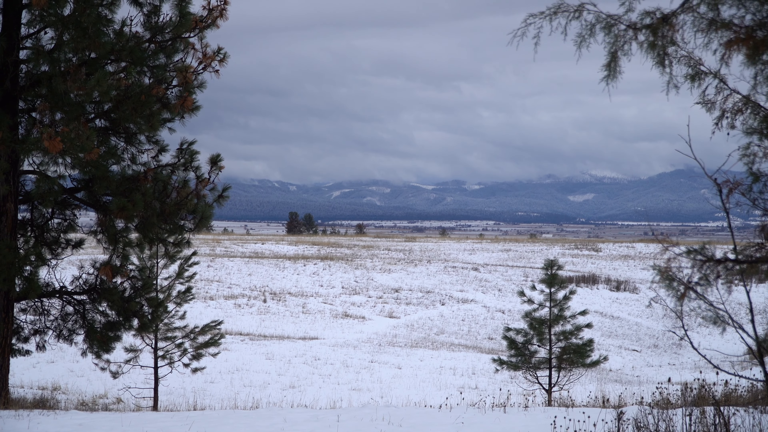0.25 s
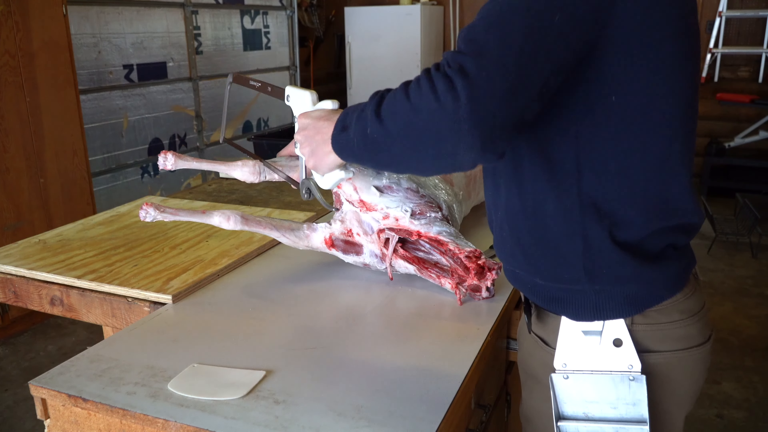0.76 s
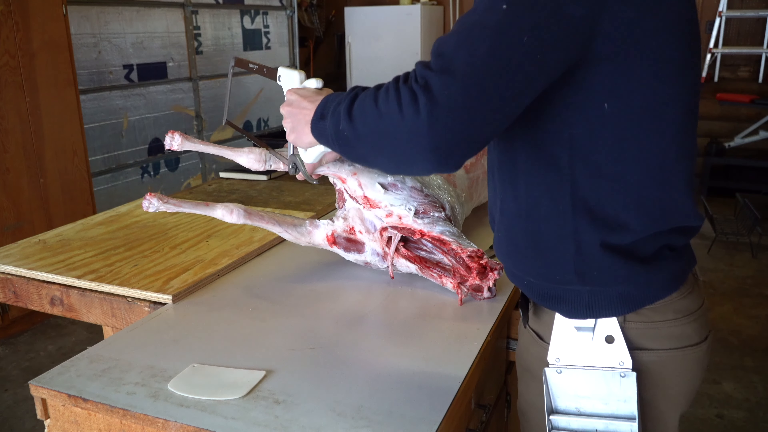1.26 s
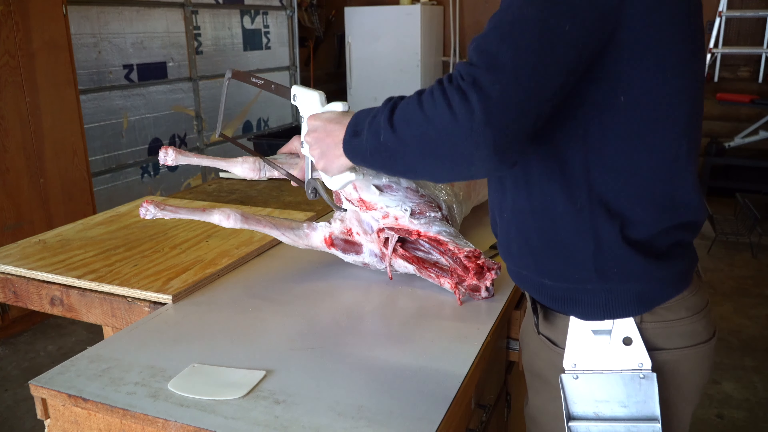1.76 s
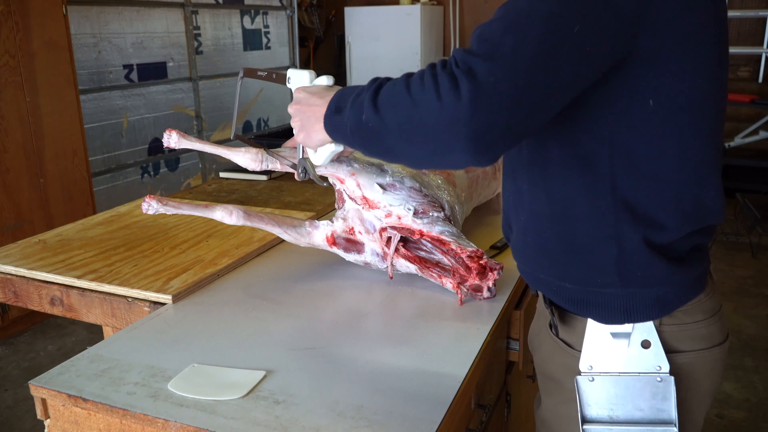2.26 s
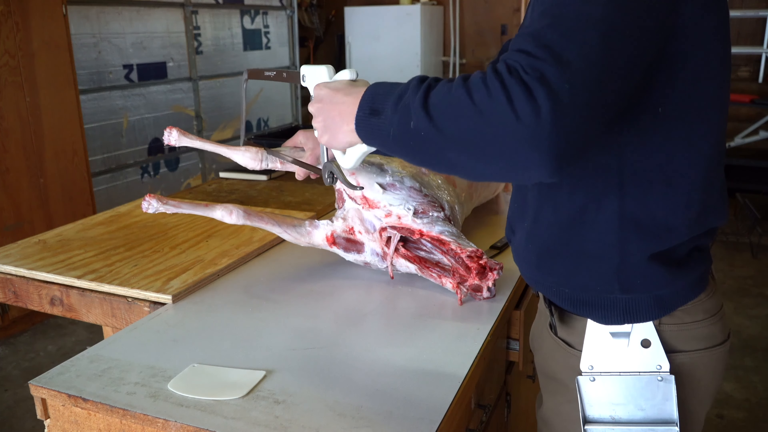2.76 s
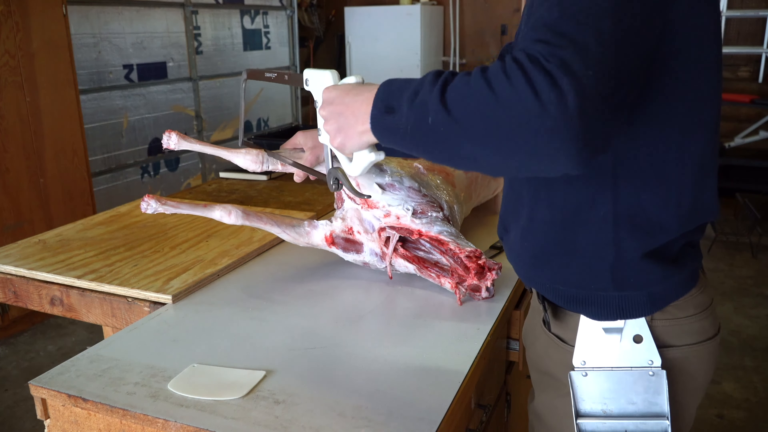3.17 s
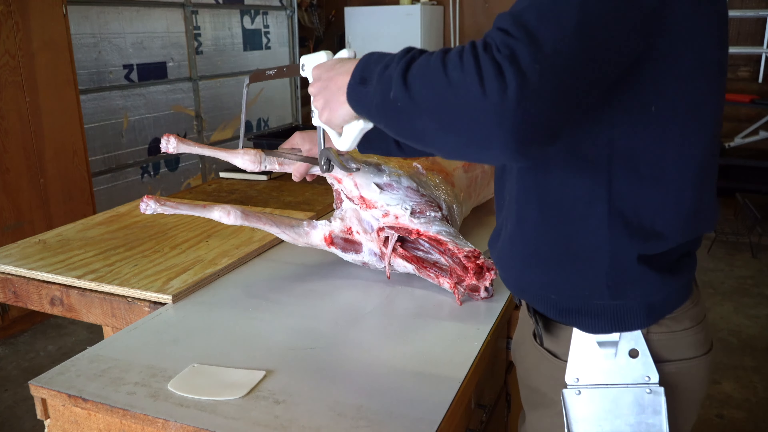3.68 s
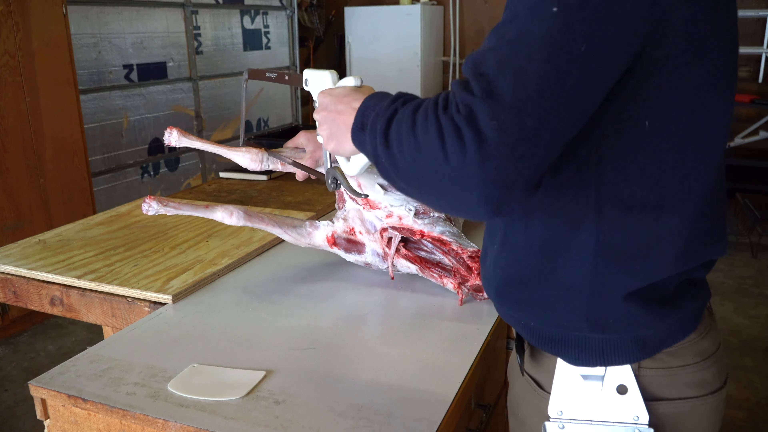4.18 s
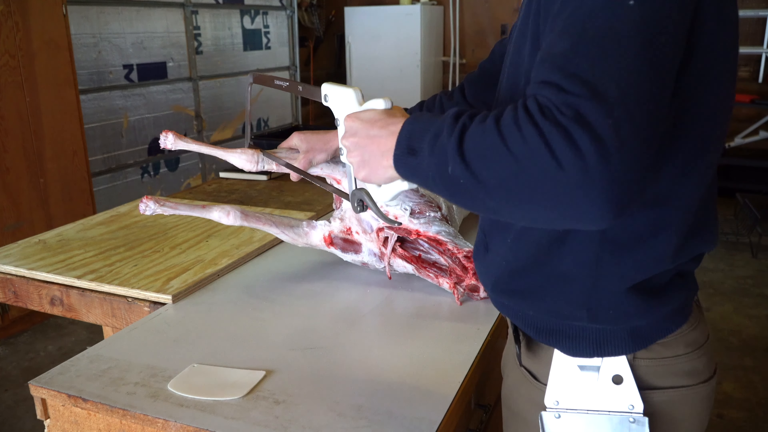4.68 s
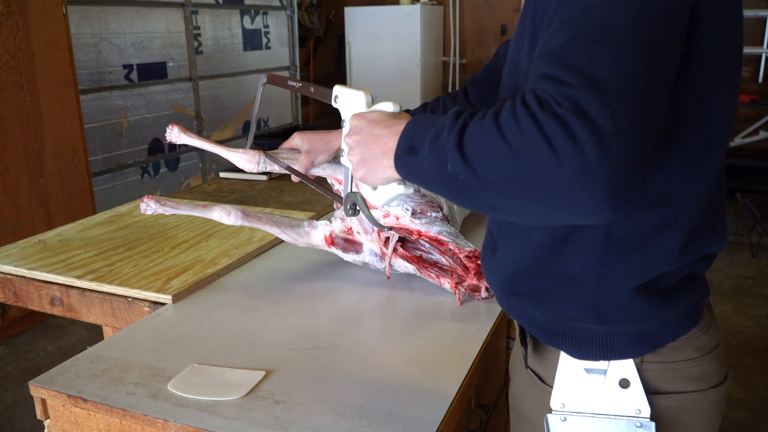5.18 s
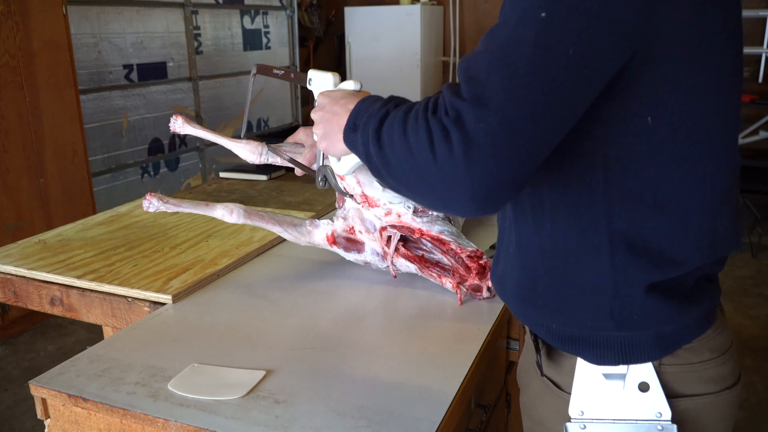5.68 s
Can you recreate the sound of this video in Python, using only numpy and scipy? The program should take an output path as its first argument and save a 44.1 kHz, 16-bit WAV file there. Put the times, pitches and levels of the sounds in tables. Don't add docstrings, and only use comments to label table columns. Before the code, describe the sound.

From 0 to 0.55 s it is quiet outdoors: deep wind buffets the microphone over faint hiss, a distant clang fades, and tiny ticks come near 0.25 s. A hard cut leads into a bare garage with faint airy hum. At 0.7-0.9 s a hand saw bites bone with a strong, gritty, quickly pulsing rasp and a brief squealing chatter. Small knocks precede another bright stroke at 1.75-1.9 s. Weaker scratches follow at 2.13 and 2.28 s, then a duller stroke around 2.55-2.65 s. From 2.7 to 3.8 s there are mostly knocks and light scrapes. A soft bass shudder of the table at 3.7-3.95 s underlies a faint cut. Short rasps return at 4.2, 4.6, 4.8 and 5.15 s, with a sharp knock at 4.28 s. The loudest, crunchiest stroke lands at 5.6-5.7 s, then a lighter one at 5.93 s. The blade rings metallically; walls give a half-second tail.

```python
import sys
import numpy as np
from scipy import signal
from scipy.fft import rfft, irfft, next_fast_len
from scipy.io import wavfile
from scipy.ndimage import uniform_filter1d

SR = 44100
rng = np.random.default_rng(int(sys.argv[2]) if len(sys.argv) > 2 else 0)


def digitize_waveform(pressure):
    field = np.atleast_2d(pressure).T
    bounded = np.clip(field, -1, 1)
    quanta = np.round(bounded * 32767).astype(np.int16)
    wavfile.write(sys.argv[1], SR, quanta)


def decibels_to_gain(level_db):
    exponent = np.asarray(level_db, float) / 20
    return 10 ** exponent


N = 261954
T = np.arange(N) / SR
HOP = 32
CUT_S = 0.561

# pitch_hz, width_hz, level_db
HIGH_MODES = [(4680, 58, 0.5), (5030, 64, -1), (5190, 48, -3), (5430, 80, 2.5), (5550, 71, 1.5)]


def saw():
    # peak_s, peak_db, rise_s (over 20 dB), fall_s (over 20 dB), brightness_db
    bites = [(.700, -40, 0.02, 0.0347, -7), (.728, -32, 0.0377, .04, -6.5), (.762, -30.5, 0.0429, .04, -2),
             (.788, -27, 0.0272, .03, -4.5), (.809, -21, 0.0265, .014, -5.5), (.855, -25, 0.0619, .03, -4),
             (.885, -33, 0.0334, .03, -7), (1.757, -38, 0.02, 0.02, -4.5), (1.778, -29, 0.0246, .04, -5),
             (1.815, -26.5, .04, 0.0336, -0.5), (1.858, -29, .05, .055, -5.5),
             (2.13, -34, 0.0063, .03, 0.5), (2.148, -37.5, 0.016, .035, 3), (2.262, -45, 0, 0.0143, 2),
             (2.277, -41.5, 0.01, 0.0146, 2.5), (2.541, -30.5, 0.028, 0.0362, -7),
             (2.578, -27.5, .05, 0.0473, -11), (2.62, -31.5, .04, 0.0329, -9.5),
             (3.822, -39, 0.0257, .08, -9.5), (3.88, -35, 0.064, 0.0451, -12),
             (3.925, -40, 0.0443, .04, -10.5), (4.169, -27, 0.01, 0.007, -6),
             (4.194, -27, 0.0271, 0.0135, -1), (4.222, -32.5, 0.027, 0.0134, -0.5),
             (4.531, -45.5, .004, 0.1, 0), (4.576, -28, .045, .04, -13.5), (4.607, -28, .035, 0.0373, -11),
             (4.645, -31, .08, .035, -14), (4.773, -24.5, 0.0017, .045, -12.5),
             (4.8, -26.5, .03, 0.05, -7.5), (4.829, -25, 0.02, .055, 0), (4.856, -25.5, 0.04, .05, -3),
             (5.07, -44, 0.03, 0.07, -1.5), (5.096, -31.5, .012, 0.1062, -6.5),
             (5.162, -25.5, 0.0324, .044, -14), (5.62, -21, .006, 0.0272, -11),
             (5.634, -20, .015, 0.0267, -8.5), (5.673, -18.5, 0.0388, 0.02, -3),
             (5.918, -35.5, 0.02, .02, -9), (5.934, -34, 0.02, .1, -6)]
    rasp_db, bright_db = surges(bites)
    force = decibels_to_gain(rasp_db)
    teeth, crush, dust_db = strokes()
    push = smear(0.66 * teeth + crush, length_s=0.0038)
    cutting = decibels_to_gain(-2) * rasp(push, bright_db)
    cutting = cutting + blade_sheen(push) * decibels_to_gain(bright_db - 1.5)
    cutting = cutting + dust() * decibels_to_gain(dust_db + 0.19 * bright_db - 4.0)
    return force * cutting + thuds(teeth, crush) + decibels_to_gain(-13) * blade_ring(push, force)


def strokes():
    # fastest_s, tooth_rate_hz, slowing_hz_per_s (away from fastest),
    # crushing_share (0-1), dust_db
    hand_strokes = [(.826, 519.9, 2199, 0.16, -23.5), (1.86, 395, 900, 0.36, -23.5),
                    (2.13, 322.5, 299.5, .66, -27), (2.28, 309.3, 399.7, 0.96, -28),
                    (2.58, 350.9, 499.8, 0.14, -33), (3.83, 311.9, 800, 0.53, -23),
                    (4.18, 317.8, 300, 0.91, -19), (4.53, 346.4, 599.5, 0.39, -28.5),
                    (4.84, 382, 299.9, 0.65, -21), (5.15, 360.6, 901.5, 0.44, -27),
                    (5.675, 399.5, 1303, 0.62, -19), (5.93, 273, 50.4, .8, -25)]
    stroke_ends = [1.3, 2.1, 2.23, 2.4, 3.3, 4.05, 4.4, 4.74, 5.0, 5.4, 5.8]
    now = np.searchsorted(stroke_ends, T)
    fastest_s, top_hz, slowing, rough, dust_db = np.transpose(hand_strokes)[:, now]
    away_s = np.maximum(fastest_s - T, 1.7 * (T - fastest_s))
    tooth_hz = np.maximum(top_hz - slowing * away_s, 210.)
    teeth, phase = impacts(tooth_hz, jitter=.035, scatter_db=2.0)
    crush = level(grit(spread_db=1.5) * (0.83 + np.exp(-phase / 0.65)), 0)
    rough = np.clip(rough, .02, .98)
    return teeth * np.sqrt(1 - rough), crush * np.sqrt(rough), dust_db


def rasp(push, bright_db):
    # freq_hz, density_db (per Hz)
    rasp_curve = [(290, -40), (500, -4.5), (1070, -6.5), (1730, -1), (2290, -8.5), (2730, -3.5),
                  (3700, -9.5), (4300, -16), (5000, -15.5), (6500, -21), (11000, -120)]
    centre_hz = 2240 * 2 ** (-0.02 * bright_db)
    bands = blotched(push, centre_hz, spread=0.63, flicker_db=7.5, rate=40, skirt=0.38)
    return evened(level(colour(bands, rasp_curve), 0))


def blade_sheen(push):
    # freq_hz, density_db (per Hz)
    sheen_curve = [(2530, -12.5), (4300, -11), (4720, -3.5), (5050, 4.5), (5360, 2), (5650, 0),
                   (5980, -12.5), (7000, -57), (9100, -67.5), (15400, -120)]
    band = level(colour(push, sheen_curve), 0) * decibels_to_gain(4.5 * walk(90))
    modes = sum(flicker(5.5, 25, decibels_to_gain(db)) * ring(push, 1. * hz, 1. * width) for hz, width, db in HIGH_MODES)
    return evened(level(band + level(modes, -4.5), 0))


def blade_ring(push, force):
    # pitch_hz, width_hz, level_db
    blade_modes = [(740, 7.9, -8), (895, 28, 2.5), (1253, 44, 7), (1680, 45, 3), (2740, 23, -9),
                   (3150, 82, 0), (3630, 71, -1.5), (4160, 48, -10)]

    def blade(x):
        return sum(flicker(2.5, 14, decibels_to_gain(db)) * ring(x, 1. * hz, 1. * width) for hz, width, db in blade_modes)

    return blade(force * push) / np.sqrt(np.mean(blade(push) ** 2))


def dust():
    # freq_hz, density_db (per Hz)
    dust_curve = [(4120, -25.5), (7000, -23), (7980, -5.5), (9840, 5), (10900, -7), (13200, -5),
                  (14700, -19), (15700, -18)]
    return level(colour(grit(spread_db=3.0) * decibels_to_gain(1.3 * walk(80)), dust_curve), 0)


def thuds(teeth, crush):
    # peak_s, peak_db, rise_s, fall_s
    shakes = [(0.717, -43, 0.031, 0.03), (0.79, -42.5, 0.061, 0.051), (0.852, -32, 0.073, 0.065),
              (1.793, -30.5, 0.025, 0.028), (1.843, -37, 0.13, 0.1), (2.129, -38, 0.011, 0.044),
              (2.279, -45, 0.066, 0.031), (2.525, -45.5, 0.01, 0.034), (2.599, -32, 0.076, 0.061),
              (3.839, -44, 0.097, 0.017), (3.895, -37.5, 0.068, 0.038), (4.171, -29.5, 0.016, 0.014),
              (4.195, -36, 0.058, 0.088), (4.594, -36.5, 0.068, 0.096), (4.643, -43, 0.007, 0.027),
              (4.778, -29, 0.014, 0.02), (4.845, -32, 0.043, 0.069), (5.125, -40, 0.067, 0.075),
              (5.187, -39, 0.015, 0.046), (5.618, -29, 0.0052, 0.048), (5.673, -25.5, 0.011, 0.028),
              (5.937, -37, 0.023, 0.01)]
    thud_db = surges([tuple(row) + (0,) for row in shakes])[0]
    body = [(90, -13.5), (170, 4), (240, 2.5), (450, 6.5), (700, -12.0)]
    return level(colour(teeth + 0.6 * crush, body), -0.33) * decibels_to_gain(thud_db)


def chatter():
    # centre_s, length_s, rate_hz, glide_hz_per_s, peak_db
    slip_trains = [(0.735, .02, 652, 801, -38), (.786, 0.013, 1172, 3000.5, -26),
                   (.808, 0.0078, 924, 1497, -16.5), (0.861, .01, 1745, -4000, -27.5),
                   (1.82, 0.015, 784, 500, -29), (1.868, 0.016, 569, -6000, -29.5),
                   (2.153, 0.019, 1680, 2, -40.5), (2.543, 0.0095, 577, 2998, -29.5),
                   (2.58, 0.022, 1195, -500, -29.5), (2.615, 0.012, 626.5, -500, -32.5),
                   (3.872, 0.0087, 896, 500, -35), (4.174, 0.0098, 1680, 0, -27.5),
                   (4.23, 0.022, 1252, 0, -39.5), (4.655, 0.042, 1253, -1, -30.5),
                   (4.86, 0.027, 1257, 0, -31), (5.152, .014, 722, -2000, -34), (5.163, 0.02, 1680, 1, -27),
                   (5.516, 0.017, 2680, 500, -50.5), (5.631, .007, 602, 3000, -25),
                   (5.674, 0.0089, 415, 0, -25), (1.773, 0.014, 5400, 2000, -30.5),
                   (1.806, 0.007, 5180, -4000, -23), (1.826, 0.011, 5010, -9000, -26),
                   (5.631, 0.0089, 1690, 0, -19), (0.728, 0.015, 1260, 500, -35),
                   (.727, 0.0098, 1620, 0, -37), (0.801, 0.015, 897, 0, -27), (.861, .013, 1254, 0, -31),
                   (.89, .014, 895, 0, -38.5), (1.84, .02, 1250, 0, -33), (1.864, .025, 1728, -1500, -35),
                   (1.94, 0.018, 770, 0, -52), (4.585, .025, 1722, 0, -32.5), (4.79, .014, 1688, 0, -27.5),
                   (4.835, .018, 1750, 0, -25.5), (4.86, .015, 3150, 0, -31.5), (5.656, .015, 1683, 0, -28),
                   (5.921, .009, 1593, 0, -38), (4.607, 0.016, 848, -1000, -35.5),
                   (3.83, .015, 903, 0, -42)]
    out = np.zeros(N)
    wobble = 0.4 * walk(150)
    flutter = decibels_to_gain(1.5 * walk(200))
    for s, length, hz, glide, db in slip_trains:
        if hz > 1050:
            share = .08
        elif glide > 1200:
            share = 0.83
        else:
            share = .4
        near = slice(int((s - 3 * length) * SR), int((s + 3 * length) * SR))
        t = T[near] - s
        turns = hz * t + glide * t ** 2 / 2
        turns = turns + wobble[near] * hz / (2 * np.pi * 2000)
        overtones = [k for k in range(4) if (k + 1) * hz < 8000]
        stack = sum(share ** k * np.cos(2 * np.pi * (k + 1) * turns) for k in overtones)
        out[near] += decibels_to_gain(db) * np.exp(-(t / length) ** 2) * stack * flutter[near]
    return out + 0.71 * ring(out, 2860.0, 500.)


def sprays():
    # peak_s, peak_db, rise_s, fall_s
    bursts = [
        (1.803, -41, .008, .01),
        (2.134, -58, .006, 0.011),
        (2.283, -69, .006, .008),
        (2.955, -63, .003, .035),
        (4.196, -45, .012, .015),
        (4.61, -54, .025, .025),
        (4.812, -43, .03, 0.031),
        (5.135, -55, .02, .02),
    ]
    spray_db = surges([tuple(row) + (0,) for row in bursts])[0]
    splinters = colour(grit(spread_db=3.5), [(5500, -4), (8000, -2), (11000, -1), (15700, -4)])
    return decibels_to_gain(spray_db) * level(splinters, 0)


def scuffs():
    # peak_s, peak_db, rise_s, fall_s, centre_hz
    rubs = [
        (.578, -63, 0.0088, 0.028, 2500),
        (1.546, -47.5, 0.017, .02, 1980),
        (1.59, -62, .05, .1, 2070),
        (3.1, -61.5, 0.19, 0.15, 2980),
        (3.36, -64, 0.11, .3, 2800),
        (3.213, -48, .005, 0.056, 3280),
        (3.245, -46.5, 0.048, 0.024, 2780),
        (3.665, -47.5, .015, 0.052, 2790),
        (4.156, -51.5, 0.15, 0.011, 1500),
        (5.526, -46, 0.051, 0.052, 1490),
    ]
    # freq_hz, gain_db
    rub_treble = [(200, 12), (5600, -4), (7000, -14.5), (16000, -21.5)]
    scuff_db, hz = surges(rubs)
    peak_s = surges([tuple(row[:4]) + (row[0],) for row in rubs])[1]
    hz = np.clip(hz - 11000 * (T - peak_s), 1200, 4000)
    rub = blotched(grit(spread_db=2.5), hz, spread=0.21, flicker_db=7.0, rate=90, skirt=0.3)
    return decibels_to_gain(scuff_db) * colour(rub + 0.3 * ring(rub, 4700.0, 700.), rub_treble)


def ticks():
    # start_s, peak_db, pitch_hz, snap_db (relative to the peak)
    knocks = [(.243, -61, 5600, -8), (.262, -65, 5000, -8), (.579, -46.5, 2680, -6),
              (1.519, -51, 1476, 3.5), (1.537, -46, 1600, -2), (1.545, -44, 1663, 3),
              (1.571, -45.5, 1500, -3), (1.601, -47, 1700, 3.5), (1.733, -40, 2800, -27),
              (1.969, -37, 1240, -2), (2.042, -34, 680, -27), (2.71, -41, 340, -27), (2.787, -31, 643, -32),
              (2.953, -49, 4500, -2), (2.98, -57, 3500, -6), (3.209, -45, 3460, -25),
              (3.243, -39.5, 550, -27), (3.382, -46, 590, -25), (3.384, -53, 2500, -25),
              (1.724, -54.5, 4400, -20), (3.464, -34.5, 670, -26), (3.655, -41.5, 1090, -8.5),
              (3.769, -35, 1680, -26), (4.279, -28.5, 2700, -5.5), (5.092, -36, 1300, -9),
              (4.969, -42, 1320, -2), (5.567, -29.5, 1690, -14), (5.6, -44, 2502, -3)]
    size = 4096
    out, t = np.zeros(N + size), T[:size]
    fade = np.exp(-np.log(1000) * t / 0.04)

    def peaked(x):
        return x / np.abs(x).max()

    def ring_twice(x, hz, width_hz):
        return ring(ring(x, hz, width_hz), hz, width_hz)

    for s, db, hz, snap_db in knocks:
        burst = (rng.standard_normal(size) + 3. * (t == 0)) * fade
        snap = ring_twice(burst, 3400.0, 4000.) + 1.5 * ring(burst, 4600.0, 850.0)
        modes = sum(decibels_to_gain(g) * ring(burst, 1. * f, 1. * w) for f, w, g in HIGH_MODES)
        snap = peaked(snap) + 0.5 * peaked(modes)
        hiss = ring_twice(burst, 10500., 8000.)
        hiss_db = -31 + 0.4 * snap_db
        knock = peaked(ring_twice(burst, hz, hz / 1.04))
        knock = knock + decibels_to_gain(snap_db) * peaked(snap) + decibels_to_gain(hiss_db) * peaked(hiss)
        start = int(s * SR)
        out[start:start + size] += decibels_to_gain(db) * knock
    return out[:N]


def shudder():
    # time_s, rate_hz, level_db
    judder = [
        (3.67, 92.8, -56.5),
        (3.77, 93.2, -42),
        (3.832, 89.9, -42),
        (3.898, 89.2, -43),
        (3.954, 94.44, -55.5),
        (4.0, 94.4, -60),
    ]
    s, rate_hz, judder_db = np.transpose(judder)
    gate = ((T >= s[0]) & (T < s[-1])).astype(float)
    gate = uniform_filter1d(gate, int(.02 * SR) + 1)
    slips, _ = impacts(np.interp(T, s, rate_hz), jitter=.09, scatter_db=2.0)
    bass = colour(slips, [(70, -6.5), (95, 3.5), (180, 0.5), (270, -8.5), (360, -3), (600, -16)])
    return gate * decibels_to_gain(np.interp(T, s, judder_db) + 3.0 * walk(30)) * level(bass, 0)


def tail(x):
    # centre_hz, t60_s, tail_db
    wall_bands = [(97, 0.77, -0.5), (314, 0.33, -14), (835, 0.8, -6.5), (2070, 0.5, -13), (5300, 0.62, -12),
                  (10000, 0.4, -16.5)]
    t, response = T[:SR], 0
    for hz, t60, db in wall_bands:
        decay = ring(rng.standard_normal(SR), hz, hz * 0.89) * np.exp(-np.log(1000) * t / t60)
        decay = decay * np.minimum(t / 0.013, 1)
        response = response + decibels_to_gain(db) * decay / np.sqrt(np.sum(decay ** 2) * SR / (np.pi * hz * .9))
    return signal.fftconvolve(x, response)[:N]


def garage():
    # freq_hz, density_db (per Hz)
    air_curve = [(12, -41), (20, -11.5), (53, -11), (85, 0.5), (133, -4.5), (260, -4.5), (299, -5.5),
                 (374, -4.5), (508, -10), (567, -8), (838, -16.5), (937, -12), (2050, -24.5), (15700, -45)]
    # pitch_hz, level_db
    hum_lines = [(188.4, -62.5), (209.9, -82), (269.2, -63), (371.4, -64.5), (479.1, -66.5), (581.4, -67)]
    air = level(colour(grit(spread_db=2.0) * decibels_to_gain(.9 * walk(9)), air_curve), -51.7)
    hum = 0
    for hz, db in hum_lines:
        hum = hum + flicker(5.3, 13, decibels_to_gain(db)) * np.sin(2 * np.pi * hz * T + 1.58 * walk(5))
    return air + 0.98 * hum


def outdoors():
    # freq_hz, density_db (per Hz)
    wind_curve = [(7.1, -29), (12, -2.5), (27, -5.5), (39, -16.5), (52, -16), (71, -28), (159, -33),
                  (368, -35), (427, -34), (778, -36.5), (2590, -50.5), (8850, -54), (15700, -58)]
    # pitch_hz, level_db, t60_s
    clang = [(572, -53, 0.19), (800, -66.5, 0.39), (1010, -69, 0.35)]
    wind = colour(rng.standard_normal(N), wind_curve) * flicker(.9, 4.4)
    wind = wind * decibels_to_gain(-53.5) / np.std(wind[T < CUT_S])
    return wind + sum(decibels_to_gain(db - 60 * T / t60) * np.sin(2 * np.pi * hz * T) for hz, db, t60 in clang)


def level(x, db):
    return x * decibels_to_gain(db) / np.sqrt(np.mean(x ** 2))


def colour(x, points):
    hz, db = np.transpose(points)
    size = next_fast_len(len(x))
    f = np.log(np.maximum(np.arange(size // 2 + 1) * SR / size, 1.))
    beyond = np.maximum(np.log(hz[0]) - f, 0) + np.maximum(f - np.log(hz[-1]), 0)
    gain = decibels_to_gain(np.interp(f, np.log(hz), db) - 60 * beyond)
    return irfft(rfft(x, size) * gain, size)[:len(x)]


def ring(x, hz, width_hz):
    return signal.lfilter(*signal.iirpeak(hz, hz / width_hz, fs=SR), x)


def walk(rate, size=1):
    k, n = int(SR / rate / size), len(T[::size])
    steps = np.clip(rng.standard_normal(n // k + 1), -3, 1.3)
    return 1.2 * uniform_filter1d(np.repeat(steps, k), k)[:n]


def flicker(db, rate, weight=1):
    return np.interp(T, T[::HOP], weight * decibels_to_gain(db * walk(rate, size=HOP)))


def impacts(hz, jitter, scatter_db):
    wander = 1 + jitter * rng.standard_normal(N // 64 + 1).repeat(64)[:N]
    turns = np.cumsum(hz * wander) / SR
    at = np.flatnonzero(np.diff(np.floor(turns)) > 0)
    size = decibels_to_gain(scatter_db * rng.standard_normal(N))
    clicks = np.zeros(N)
    clicks[at] = size[at] / np.sqrt(hz[at])
    return level(clicks - clicks.mean(), 0), turns % 1


def grit(spread_db):
    crumb_db = spread_db * np.minimum(rng.exponential(size=N), 7)
    return level(rng.standard_normal(N) * decibels_to_gain(crumb_db), 0)


def smear(x, length_s):
    size = next_fast_len(N)
    knots = np.linspace(0, size // 2, num=90)
    delay = np.interp(np.arange(size // 2 + 1), knots, rng.random(size=90)) * length_s * SR
    return irfft(rfft(x, size) * np.exp(-2j * np.pi * np.cumsum(delay) / size), size)[:N]


def blotched(x, centre_hz, spread, flicker_db, rate, skirt):
    out = 0
    for hz in 600 * 2 ** np.arange(0, 3.4, 1 / 6):
        near = np.exp(-(np.log(centre_hz[::HOP] / hz) / spread) ** 2) + skirt
        out = out + flicker(flicker_db, rate, near) * ring(x, hz, hz / 10)
    return level(out, 0)


def surges(rows):
    power, mix, t = 1e-14, 0, T[::HOP]
    for s, db, rise, fall, value in rows:
        slope_s = np.where(t < s, max(rise, .002), max(fall, .005))
        part = decibels_to_gain(2 * db - 40 * np.abs((t - s) / slope_s) ** 1.72)
        power, mix = power + part, mix + part * value
    return np.interp(T, t, 10 * np.log10(power)), np.interp(T, t, mix / power)


def evened(x):
    size = int(0.013 * SR)
    power = uniform_filter1d(uniform_filter1d(x ** 2, size), size)
    return level(x / (power + 1e-9) ** (0.73 / 2), 0)


def scene():
    work = saw() + sprays() + scuffs() + ticks()
    singing = chatter()
    inside = np.clip((T - CUT_S) / 0.0082, 0, 1)
    places = (1 - inside) * outdoors() + inside * garage()
    echo = tail(work + .55 * singing)
    return (places + shudder() + work + singing + echo)[None]


def low_pass(x):
    return signal.sosfilt(signal.butter(12, 15810, fs=SR, output="sos"), x)


def record(dry):
    mix = np.tanh(0.81 * dry) / 0.79
    return low_pass(mix)


dry = scene()
out = record(dry)
digitize_waveform(out)
```